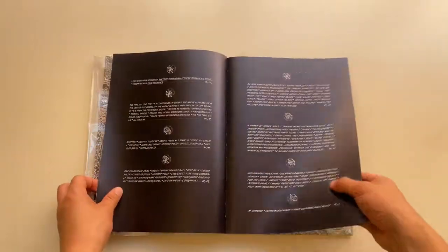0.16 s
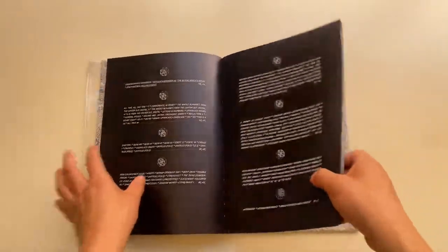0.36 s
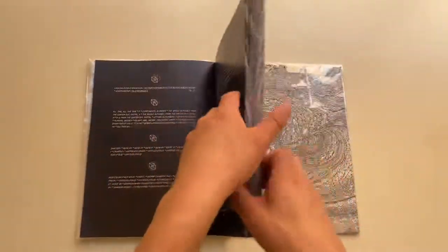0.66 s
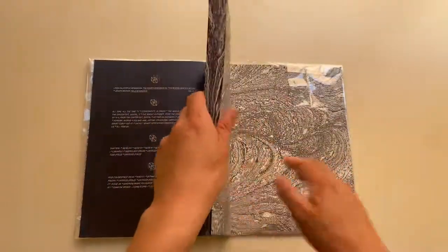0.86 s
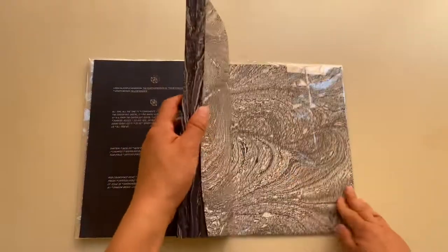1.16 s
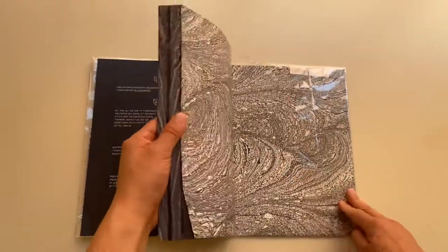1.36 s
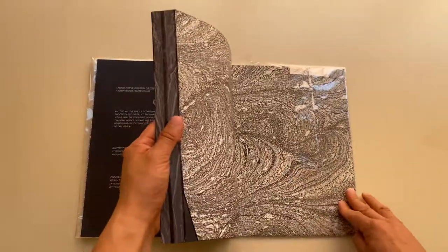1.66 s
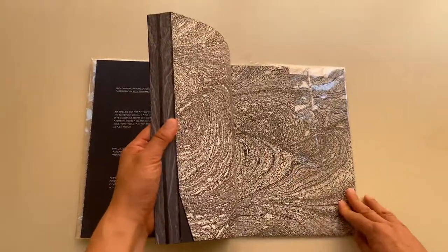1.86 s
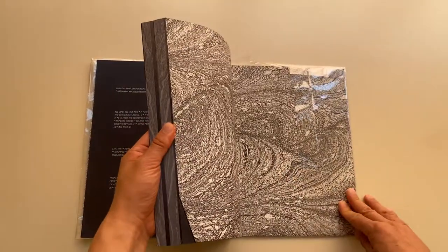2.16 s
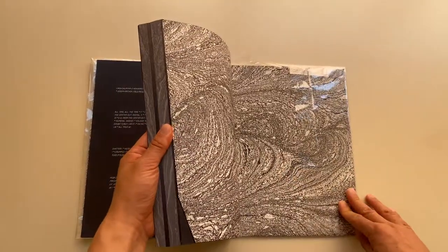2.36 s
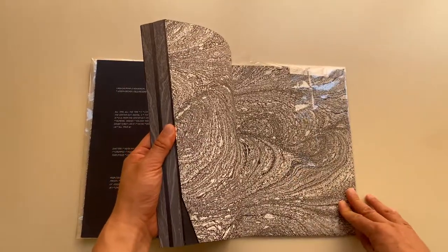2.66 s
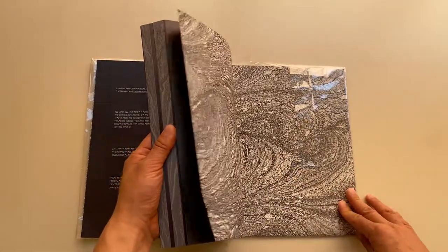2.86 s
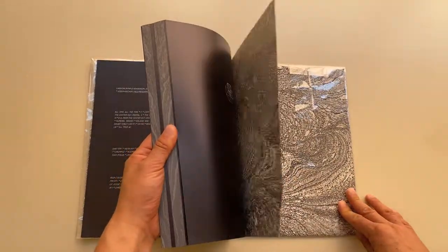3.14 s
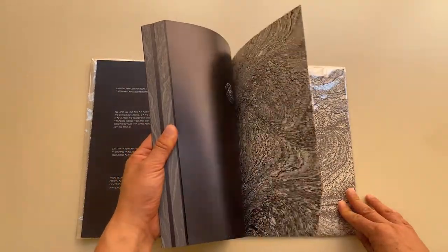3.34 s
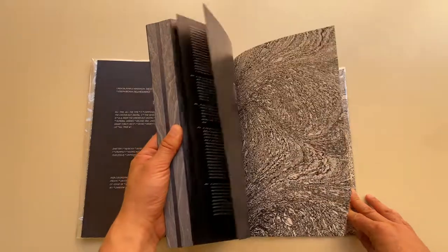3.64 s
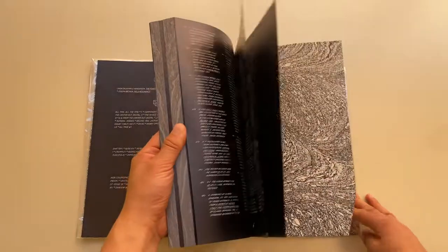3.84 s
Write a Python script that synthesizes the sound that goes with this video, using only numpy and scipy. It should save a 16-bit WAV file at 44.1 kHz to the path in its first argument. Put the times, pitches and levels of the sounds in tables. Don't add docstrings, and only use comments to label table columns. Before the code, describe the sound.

Thick glossy book pages: fingers settle with low table shudder and small crackles from 0 s, then a loud burst of snaps, hiss, air flop and soft knocks at 0.23-0.4 s, fading with stray ticks. Regrip rustles at 1.0-1.2 s, with a tiny spine creak at 1.23 s. Then quiet fan hum, faint ticks around 1.65, 2.2 and 2.55-2.8 s, and slightly clearer sheet flicks from 3.5 to 3.95 s. Close stereo, faint short echo.

```python
import sys
import numpy as np
from scipy import signal
from scipy.fft import rfft, irfft, next_fast_len
from scipy.io import wavfile
from scipy.ndimage import uniform_filter1d

SR = 44100
rng = np.random.default_rng(int(sys.argv[2]) if len(sys.argv) > 2 else 0)


def volts(x):
    e = np.asarray(x, float) / 20
    return 10 ** e


def digitize_waveform(pressure):
    field = np.atleast_2d(pressure).T
    bounded = np.clip(field, -1, 1)
    quanta = np.round(bounded * 32767).astype(np.int16)
    wavfile.write(sys.argv[1], SR, quanta)


N = 176400


def evened(x):
    return x / np.sqrt(np.mean(x ** 2) + 1e-20)


def read(points, hz):
    f, value = np.transpose(points)
    return np.interp(np.log(hz + 1), np.log(f + 1), value)


def add(mix, start, sound):
    part = mix[:, max(round(start * SR), 0):][:, :sound.shape[1]]
    part += sound[:, :part.shape[1]]


def colour(x, db_at):
    size = next_fast_len(x.shape[-1] + 2048)
    gain = volts(db_at(np.fft.rfftfreq(size, 1 / SR)))
    return irfft(rfft(x, size) * gain, size)[..., :x.shape[-1]]


def peak_db(f, hz, width):
    return -10 * np.log10(1 + (2 * (f - hz) / width) ** 2)


def spread(pair, wide):
    mid = colour(pair[0], lambda f: -10 * np.log10(1 + volts(2 * read(wide, f))))
    side = colour(pair[1], lambda f: -10 * np.log10(1 + volts(-2 * read(wide, f))))
    return np.array([mid + side, mid - side])


def leaned(pair, lean):
    left = colour(pair[0], lambda f: read(lean, f) / 2)
    right = colour(pair[1], lambda f: -read(lean, f) / 2)
    return np.array([left, right])


# frequency in Hz, level in dB per Hz.
HUM = [(15, -38), (25, -10), (59, 3), (72, -2.5), (86, -10), (118, -7.5), (179, -11), (321, -23),
       (600, -36), (780, -69), (1320, -120)]
# frequency in Hz, level in dB per Hz.
HISS = [(240, -25), (450, -4.5), (1000, -9), (3000, -16.5), (7000, -19), (8300, -28), (11700, -28),
        (13000, -36), (16500, -35)]
# frequency in Hz, side minus middle in dB.
WIDE_ROOM = [(60, -9), (180, -6.5), (550, 0), (1650, 1.5), (4970, 0.5), (15000, -1)]
# frequency in Hz, left minus right in dB.
LEAN_ROOM = [(60, -1.5), (180, -5), (550, 3.5), (1650, 1), (4970, 6), (15000, -4.5)]


def air():
    hum_db, fan_db, hiss_db, brush_db = -63.5, -72.5, -82, -79.5
    fan_hz, fan_width_hz = 112.6, 14
    brush_s, brush_span_s, brush_hz, brush_width_hz = 2.15, 0.19, 594, 1200
    t = np.arange(N) / SR
    noise = rng.standard_normal((4, 2, N))
    lumps = evened(uniform_filter1d(uniform_filter1d(rng.standard_normal(N), 3500), 3500))
    hum = volts(hum_db + 0.91 * lumps) * evened(colour(noise[0], lambda f: read(HUM, f)))
    fan = volts(fan_db) * evened(colour(noise[1], lambda f: 2 * peak_db(f, fan_hz, fan_width_hz)))
    hiss = volts(hiss_db) * evened(colour(noise[2], lambda f: read(HISS, f)))
    brush = evened(colour(noise[3], lambda f: 2 * peak_db(f, brush_hz, brush_width_hz)))
    brush = brush * volts(brush_db) * np.exp(-((t - brush_s) / brush_span_s) ** 2)
    return leaned(spread(hum + fan + hiss + brush, WIDE_ROOM), LEAN_ROOM)


# time in seconds, level in dB.
SHAKE = [
    (0.0, -43.5),
    (0.435, -58.5),
    (1.3, -58.5),
    (1.7, -77.5),
]


def table():
    shake_hz, shake_width_hz = 45, 45
    s, db = np.transpose(SHAKE)
    body = evened(colour(rng.standard_normal(N), lambda f: 2 * peak_db(f, shake_hz, shake_width_hz)))
    level = volts(np.interp(np.arange(N) / SR, s, db, right=-120) - 0.5)
    return body * level * volts([[-.9], [.9]])


def crackle(size, share=.45):
    slips_per_s, spread_db, slip_s = 900, 3.0, .002
    sizes = volts(spread_db * np.minimum(rng.exponential(1, size), 4))
    slips = sizes * (rng.random(size) < slips_per_s / SR)
    grip = evened(signal.lfilter([1], [1, -np.exp(-1 / (slip_s * SR))], slips))
    return rng.standard_normal((2, size)) * evened(1 - share + share * grip)


def patchy(x):
    patch_db = 3
    z = signal.stft(x, nperseg=256)[2]
    field = uniform_filter1d(rng.standard_normal(z.shape[1:]), 4, 0)
    field = evened(uniform_filter1d(field, 5, 1))
    return evened(signal.istft(z * volts(patch_db * field), nperseg=256)[1][:, :N])


# frequency in Hz, level in dB per Hz.
SHEET = [(88, -35), (150, -11.5), (259, -17.5), (448, -15), (4490, -8.5), (8400, -19.5), (11500, -22.5),
         (13400, -35), (16000, -54.5)]
# frequency in Hz, side minus middle in dB.
WIDE_PAPER = [(60, -23), (130, -19), (290, -5), (640, 2), (1410, 0), (3100, 1.5), (6820, -2), (15000, -4)]
# time in seconds, level in dB, boost of the low
# body in dB.
SLIDE = [
    (0, -52, 5.5),
    (.1, -61.5, 13.5),
    (0.213, -62, 17),
    (0.231, -34.5, 4),
    (0.298, -40.5, 14.5),
    (.42, -49, 7),
    (0.651, -63.5, 14.5),
    (0.861, -69.5, 8),
    (.99, -88.5, 7),
         (.995, -84, 22),
    (1.02, -46, -16),
    (1.059, -58, 8.5),
    (1.11, -54.5, 5),
    (1.14, -65.5, 10.5),
    (1.22, -59.5, -5),
    (1.3, -68.5, 3),
    (1.369, -71, 9),
    (1.45, -90.5, -3.5),
]


def sliding():
    lean_db, body_hz = 1.5, 900
    t = np.arange(N) / SR
    s, db, dull = np.transpose(SLIDE)
    base = patchy(colour(crackle(N, .32), lambda f: read(SHEET, f)))
    low = colour(base, lambda f: -10 * np.log10(1 + (f / body_hz) ** 4))
    sound = volts(np.interp(t, s, dull)) * low + base - low
    sound = sound * volts(np.interp(t, s, db, right=-120))
    return spread(sound, WIDE_PAPER) * volts([[lean_db / 2], [-lean_db / 2]])


def snap(start, db, hz, tilt_db, rustle_db):
    rise_s, crack_s, rustle_s, rustle_end_s = .0005, .0014, .032, .05
    trim_db, ring_db, ring_q, low_cut_hz = -2, 1, 17, 3100
    t = np.arange(6000) / SR
    cut = min(0.88 * hz, low_cut_hz)

    def tone(f):
        tilt = tilt_db * np.log2(np.maximum(f, cut) / 3000)
        return tilt - 10 * np.log10(1 + (cut / (f + 1)) ** 4)

    def rustle_tone(f):
        bump = 10 * np.log10(1 + volts(2 * (0.5 + peak_db(f, hz, hz / 3))))
        return tone(f) + 0.62 * read(SHEET, f) + bump

    scale = np.sqrt(np.mean(volts(2 * tone(np.linspace(800, 12000, 200)))))
    rise = np.minimum(t / rise_s, 1)
    clicks = rng.choice([-1., 1.], (2, len(t)))
    crack = colour(clicks * rise * np.exp(-t / crack_s), tone) / scale
    ring = volts(ring_db + 5.0 * np.log2(min(hz, 4800) / 2500)) * rise
    ring = ring * np.exp(-np.pi * max(hz, low_cut_hz) * t / ring_q)
    ring = ring * np.sin(2 * np.pi * (hz * t + rng.random((2, 1))))
    rustle = volts(min(rustle_db, 6)) * np.minimum(t / 0.0016, 1)
    rustle = rustle * np.exp(-t / rustle_s) / (1 + (t / rustle_end_s) ** 6)
    settle = colour(crackle(len(t)) * rustle, rustle_tone) / scale
    return start, volts(db + trim_db) * (crack + ring + settle)


def flop(start, db, length, hz, sag):
    t = np.arange(3000) / SR
    turns = np.cumsum(hz * (sag + (1 - sag) * np.exp(-2 * t / length))) / SR
    tone = np.sin(2 * np.pi * turns) + 0.27 * np.sin(2 * np.pi * 2 * turns)
    shape = np.minimum(t / (.15 * length), 1) / (1 + (t / length) ** 4)
    return start, volts(db) * tone * shape * volts([[1.2], [-1.2]])


def swish(start, db, length, hz, width):
    t = np.arange(4000) / SR
    band = evened(colour(crackle(len(t), .32), lambda f: 2 * peak_db(f, hz, width)))
    return start, volts(db) * band * np.minimum(t / .0015, 1) / (1 + (t / length) ** 5)


def knock(start, db, length, hz, width):
    t = np.arange(5000) / SR
    body = colour(rng.standard_normal(len(t)), lambda f: 2 * peak_db(f, hz, width))
    body = body / np.std(body[:round(length * SR)])
    shape = np.minimum(t / 0.001, 1) / (1 + (t / length) ** 6)
    return start, volts(db) * body * shape * np.ones((2, 1))


# multiple of the creak pitch, level in dB.
CREAK = [(1, -3.5), (2, -8), (3, -0.5)]


def creak():
    start_s, length_s, level_db, pitch_hz, jitter = 1.233, .034, -52, 216, .02
    t = np.arange(2500) / SR
    wander = evened(uniform_filter1d(rng.standard_normal(len(t)), 300))
    turns = np.cumsum(pitch_hz * (1 + jitter * wander)) / SR
    tone = sum(volts(db) * np.sin(2 * np.pi * k * turns) for k, db in CREAK)
    shape = np.minimum(t / .004, 1) * np.exp(-t / .07) / (1 + (t / length_s) ** 10)
    return start_s, volts(level_db) * tone * shape * volts([[2.5], [-2.5]])


# frequency in Hz, seconds to fall by 60 dB.
ROOM = [(200, .16), (2000, .18), (12000, .1)]


def walls(x):
    taps = np.zeros((2, SR // 2))
    at = np.arange(200, SR // 2 - 20, 20) + rng.integers(0, 20, (2, (SR // 2 - 201) // 20))
    np.put_along_axis(taps, at, rng.choice([-1., 1.], at.shape), 1)
    hz, t, z = signal.stft(taps, SR, nperseg=256)
    tail = signal.istft(z * volts(-60 * t / read(ROOM, hz)[:, None]), SR, nperseg=256)[1]
    return signal.fftconvolve(x, tail / np.linalg.norm(tail[0]), axes=1)[:, :N]


def shaded(x, bands):
    top_hz, top_db = 14014, -7

    def dips(f, column):
        bumps = sum(row[column] * np.exp(-((f - row[0]) / row[1] * 2) ** 4) for row in bands)
        return bumps + top_db / (1 + (top_hz / (f + 1)) ** 20)

    mid = colour((x[0] + x[1]) / 2, lambda f: dips(f, 2))
    side = colour((x[0] - x[1]) / 2, lambda f: dips(f, 3))
    return np.array([mid + side, mid - side])


# start in seconds, peak in dB, sheet pitch in Hz,
# tilt in dB per octave, rustle afterwards in dB.
GRIP = [(0.112, -38.5, 1170, -3.5, -25), (0.178, -39.5, 1170, -9, -18), (0.198, -43, 1100, 0.5, 1),
        (0.217, -43.5, 3500, -3, 11), (0.224, -27, 4300, 5.5, -7.5), (0.234, -26, 5400, -4.5, -8.5),
        (0.242, -22, 4280, -5, -7), (0.251, -24.5, 4040, -10, -17), (0.254, -18.5, 2300, -4, -5.5),
        (0.323, -29, 1050, -3.5, -6), (0.364, -28, 1480, -13, -13.5), (0.368, -27.5, 10570, 10, -5.5),
        (0.666, -33.5, 11900, 2, -13), (0.667, -33.5, 860, -3.5, -2.5), (0.768, -39.5, 2360, -9.5, -25),
        (0.769, -42.5, 1320, -8.5, -7.5), (0.859, -41.5, 2316, -11, -22), (0.864, -55, 1920, -17, -7),
        (0.956, -55.5, 1550, -18, -12), (1.005, -49, 4330, -3, -14), (1.014, -32, 2120, -9.5, -19),
        (1.025, -35, 3570, -4.5, -14), (1.053, -44, 3480, -18, 0.5), (1.106, -42, 1230, -2, -19),
        (1.15, -29, 4730, -4, -14), (1.169, -46, 5200, -3, -19)]
# start in seconds, peak in dB, sheet pitch in Hz,
# tilt in dB per octave, rustle afterwards in dB.
FLICKS = [(1.645, -57, 2310, -6.5, -2.5), (2.19, -57, 2690, -10.5, -4), (2.55, -65, 7090, -4, -9.5),
          (2.612, -53.5, 6230, -4, -5.5), (2.619, -51.5, 2320, -4, -4), (2.641, -59, 2720, -6, -6),
          (2.711, -57.5, 6230, -5, -13.5), (2.785, -58.5, 6800, 2, -13), (2.807, -54.5, 5820, -5.5, 1),
          (2.813, -52.5, 2015, -3.5, -10), (3.475, -59.5, 7100, 1, -8), (3.536, -48, 8680, -3, -7),
          (3.566, -54, 8150, 0.5, -3.5), (3.636, -55, 4813, -2.5, -9.5), (3.759, -48.5, 1007, -4.5, -6.5),
          (3.837, -67, 12440, 9, 4.5), (3.919, -43, 1124, -5.5, -2.5), (3.951, -54, 2920, -8.5, 4.5)]
# start in seconds, level in dB, length in seconds, #
# starting pitch in Hz, share of that pitch left at the end.
FLOPS = [(0.232, -35, 0.0053, 570, 1), (0.27, -31, 0.012, 700.3, .85), (1.084, -54, .006, 487, 0.86),
         (3.759, -56.5, .011, 576, 0.62), (0.112, -50.5, 0.0023, 1150, 0.91), (0.178, -55, 0.0037, 1170, 1),
         (0.668, -48.5, 0.004, 828, 0.94), (0.7688, -52.5, 0.0017, 2450, 0.99),
         (0.7693, -62, 0.0034, 1300, 0.94), (3.637, -69.5, 0.0029, 1603, 1), (3.921, -61, 0.0052, 1110, 1)]
# start in seconds, level in dB, length in seconds,
# centre in Hz, width in Hz.
SWISHES = [(0.194, -50, 0.037, 1190, 910), (0.233, -37.5, .008, 4520, 4002),
           (0.241, -33, 0.0056, 4000, 4046), (0.25, -31, 0.016, 3070, 4494), (1.004, -54, .008, 4470, 4040),
           (1.01, -40.5, 0.0097, 2970, 2900), (1.02, -36.5, 0.0067, 3220, 3360),
           (1.028, -44.5, 0.015, 2670, 2994), (1.042, -45.5, 0.013, 3280, 2380),
           (1.157, -56.5, 0.028, 5000, 2996), (0.252, -40.5, 0.017, 10900, 2500),
           (1.342, -75, 0.028, 15030, 1503), (0.7, -71, 0.054, 14600, 1500)]
# start in seconds, level in dB, length in seconds,
# body pitch in Hz, width in Hz.
KNOCKS = [
    (0.24, -37.5, .025, 1050, 350),
    (0.259, -40.5, 0.03, 450, 350),
    (0.29, -49.5, 0.058, 175.5, 70),
    (.35, -54, 0.025, 165, 78),
    (0.384, -57, 0.046, 514, 510),
    (1.034, -62.5, 0.094, 206, 198.8),
    (1.079, -64.5, 0.025, 417, 283),
    (3.925, -68, 0.075, 384, 300),
]
# frequency in Hz, left minus right in dB.
LEAN_PAPER = [(250, -2), (700, -0.5), (2000, -1), (5000, 2), (10000, -2)]
# frequency in Hz, width in Hz, middle in dB, side in dB.
SHADOW = [(8600, 1600, -11, 0), (11000, 1800, 0, -17), (13400, 1900, -20, 6)]
# frequency in Hz, width in Hz, middle in dB, side in dB.
SHADOW_FAR = [(13100, 1200, -10, 3)]


def scene():
    echo_db = -17
    grip, flicks, knocks, spine = np.zeros((4, 2, N))
    for row in GRIP:
        add(grip, *snap(*row))
    for row in FLICKS:
        add(flicks, *snap(*row))
    for row in SWISHES:
        add(grip, *swish(*row))
    for row in FLOPS:
        add(knocks, *flop(*row))
    for row in KNOCKS:
        add(knocks, *knock(*row))
    add(spine, *creak())
    near = spread(grip, WIDE_PAPER) * volts([[.9], [-.9]])
    far = spread(flicks, WIDE_PAPER)
    echo = volts(echo_db) * walls(near + far + knocks)
    block = shaded(leaned(sliding() + near, LEAN_PAPER) + echo, SHADOW)
    return air() + table() + spine + knocks + block + shaded(far, SHADOW_FAR)


def top_cut(x):
    return signal.sosfilt(signal.butter(12, 16830, fs=SR, output="sos"), x)


def record(dry):
    edge_hz, edge_slope_hz, bass_hz = 15600, 1200, 36

    def limits(f):
        treble = -45. * np.clip((f - edge_hz) / edge_slope_hz, 0, 2)
        return treble - 10 * np.log10(1 + (bass_hz / (f + 1)) ** 6)

    return top_cut(colour(dry, limits))


dry = scene()
out = record(dry)
digitize_waveform(out)
```